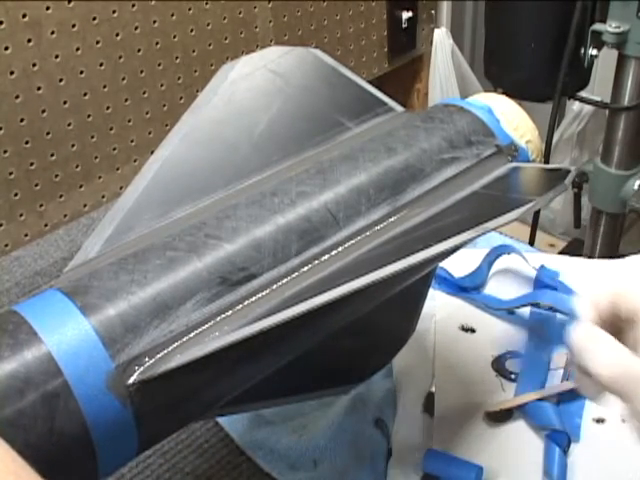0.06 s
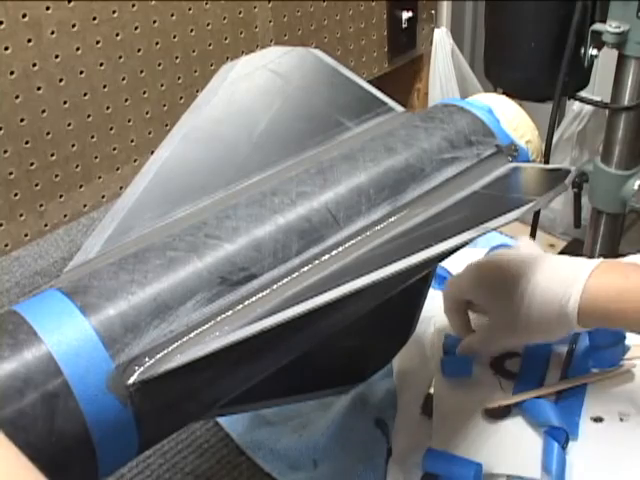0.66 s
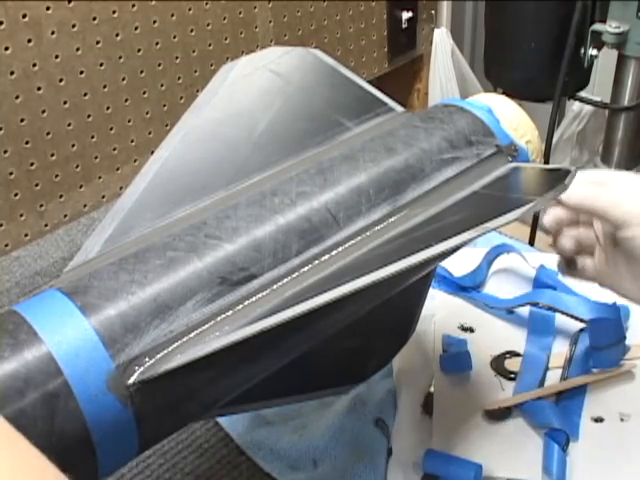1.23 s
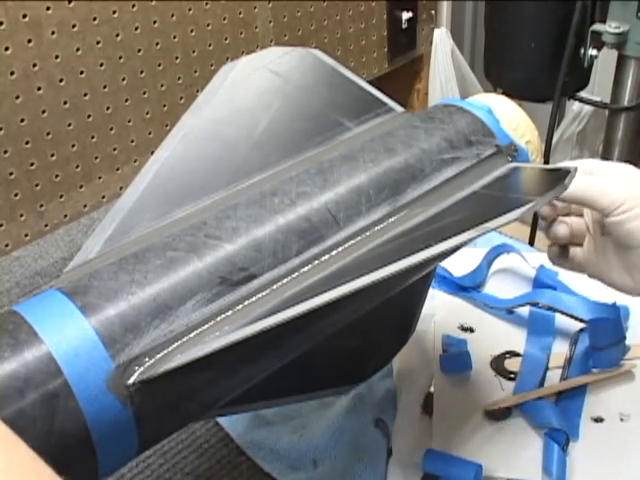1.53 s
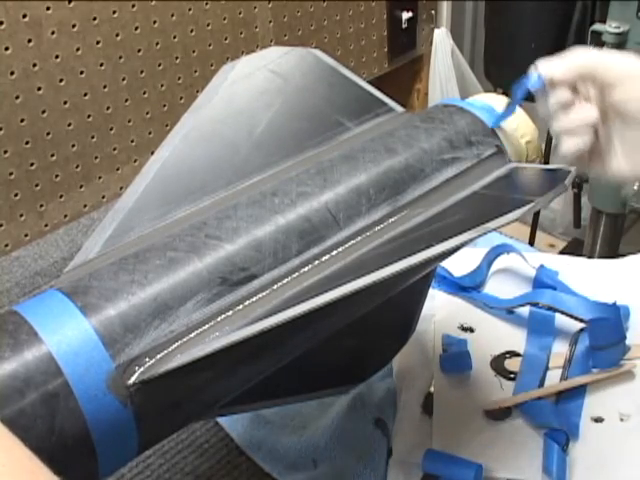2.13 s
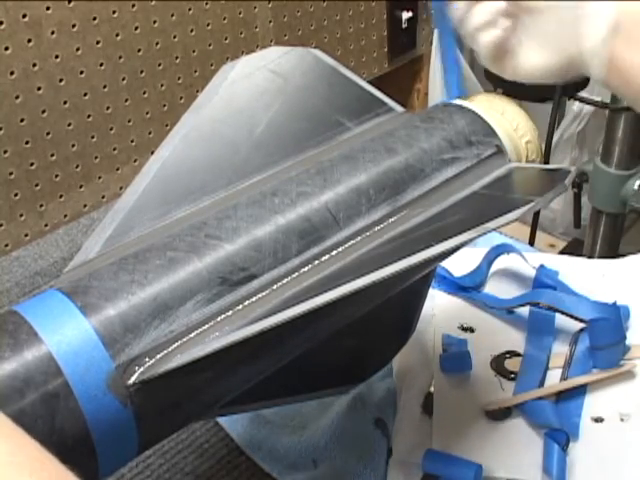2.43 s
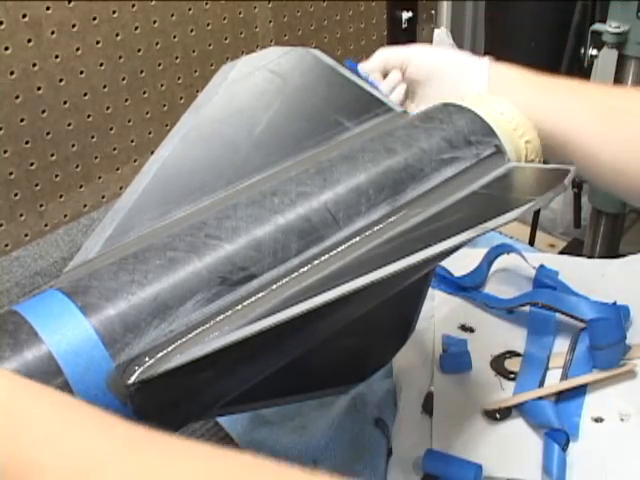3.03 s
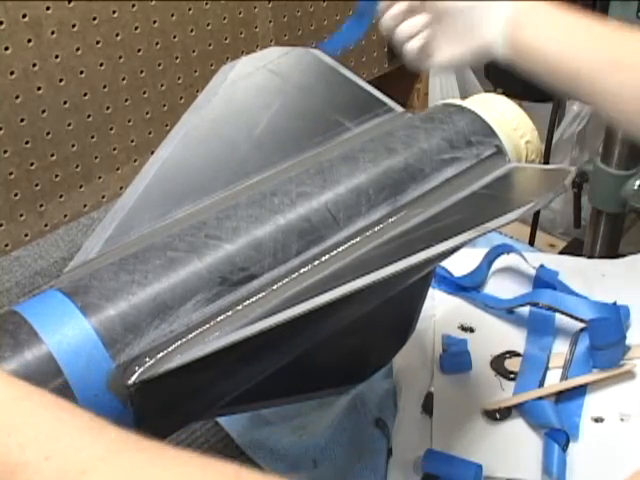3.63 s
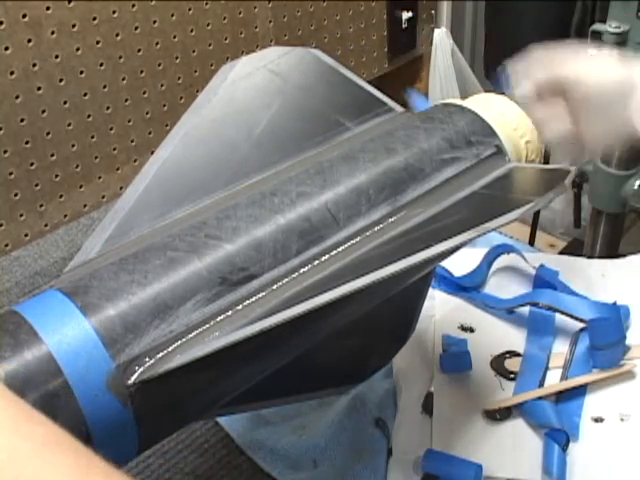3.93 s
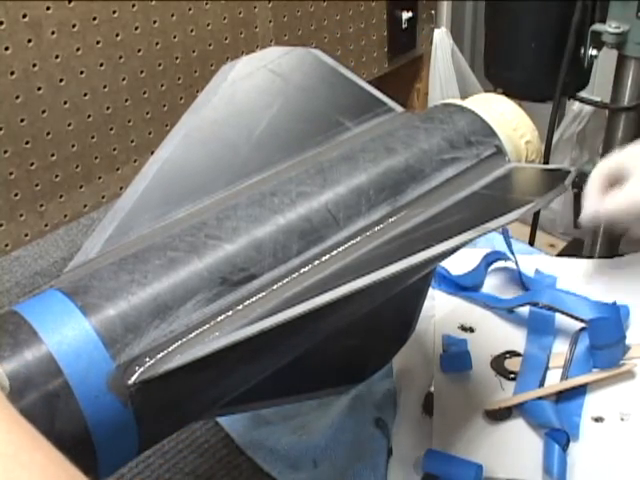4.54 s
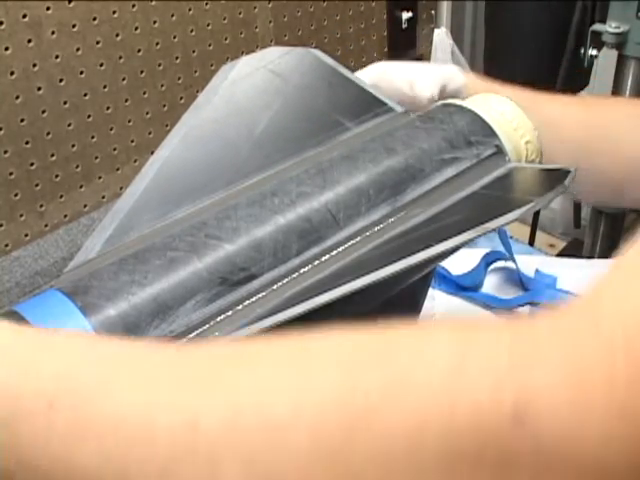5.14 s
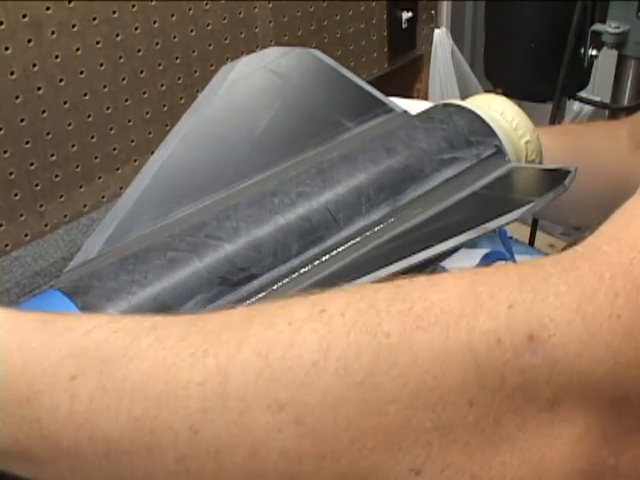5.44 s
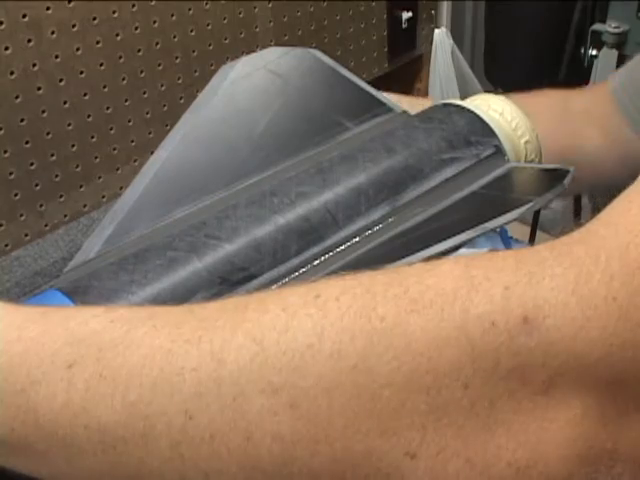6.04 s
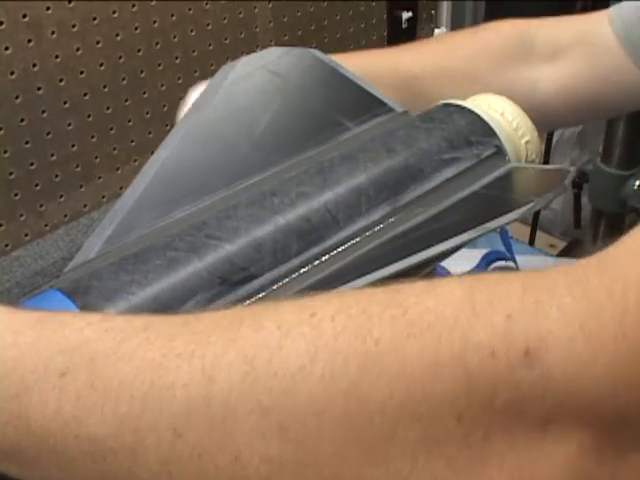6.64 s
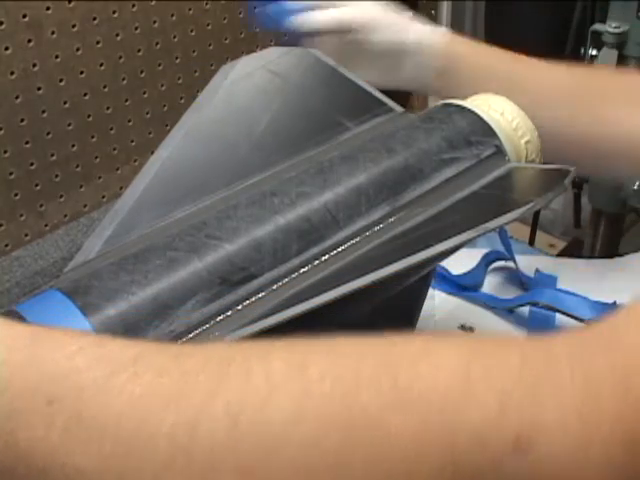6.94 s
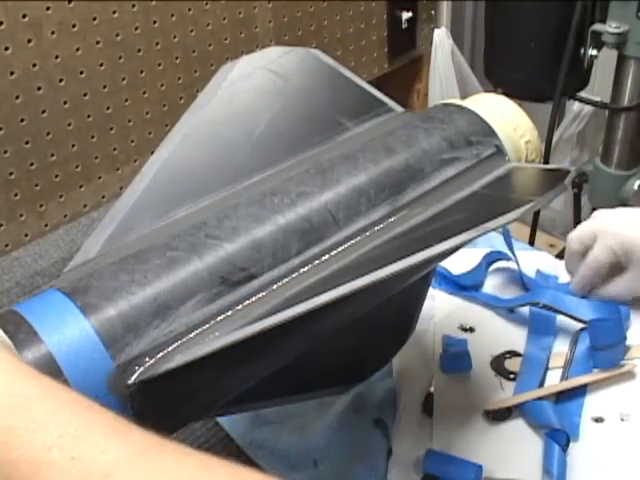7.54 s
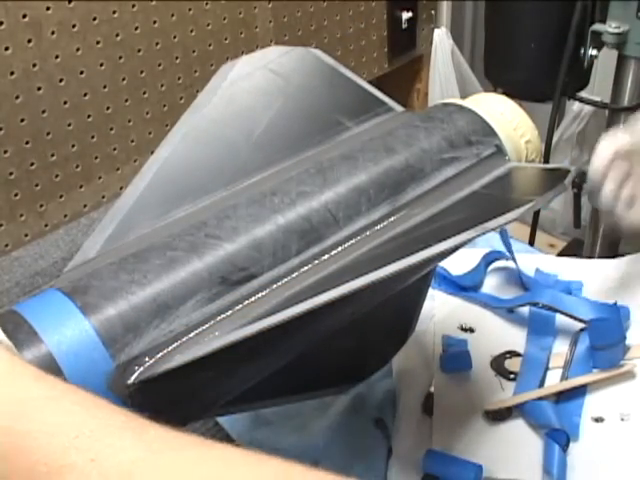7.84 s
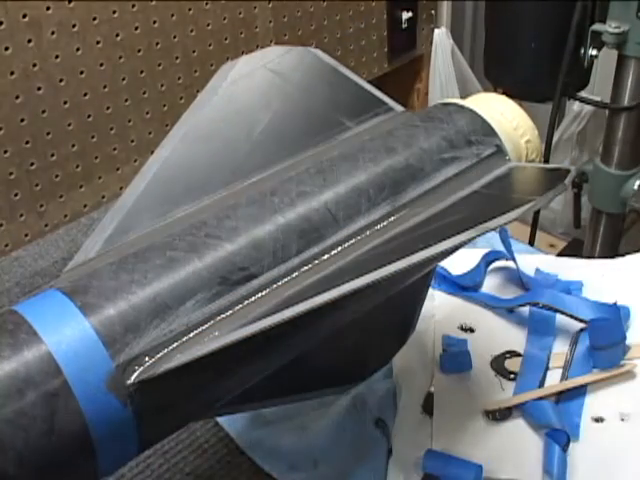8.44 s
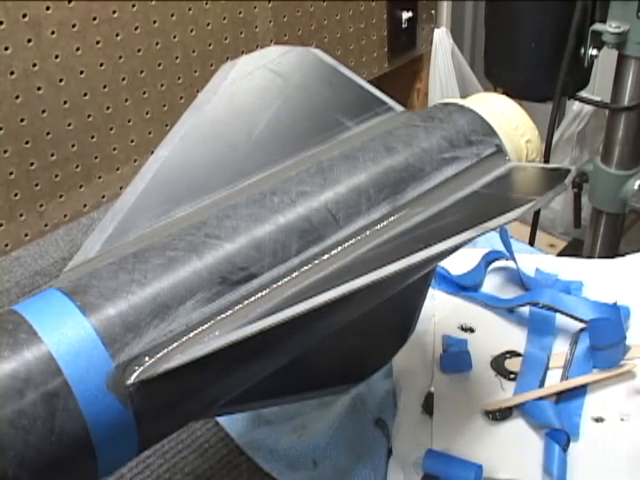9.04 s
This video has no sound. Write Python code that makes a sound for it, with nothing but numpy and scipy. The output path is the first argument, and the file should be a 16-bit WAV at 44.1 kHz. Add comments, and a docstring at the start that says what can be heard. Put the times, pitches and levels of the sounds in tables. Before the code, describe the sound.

Hollow knocks and crisp snaps punctuate soft tape peeling and one quick rip, with faint glove rustles over a low hum.

```python
"""Peeling tape from a finned tube

Masking tape is pulled off a hollow tube on a workshop bench. Glue threads snap in dense runs and ring
the tube, which rocks and knocks on its rest. A gloved hand crumples the strips and sticks them aside.
The room is small and dry, with a faint hum."""
import sys
import numpy as np
from scipy import signal
from scipy.fft import rfft, irfft
from scipy.io import wavfile

SR = 44100
rng = np.random.default_rng(int(sys.argv[2]) if len(sys.argv) > 2 else 0)


def waveform_to_disk(signal):
    """Save audio, clipped to [-1, 1], as 16-bit WAV at the path in sys.argv[1]."""
    frames = np.transpose(np.atleast_2d(signal))
    scaled = np.clip(frames, -1, 1) * 32767
    samples = np.round(scaled).astype(np.int16)
    wavfile.write(sys.argv[1], SR, samples)


N = 409248
TIME = np.arange(N) / SR

# pulling effort of four strokes, on the scale of their hiss: (time [s], level [dB])
FIRST_TUG = [(1.79, -60), (1.868, -52.5), (1.912, -51.5)]
LONG_PEEL = [(1.985, -44), (1.991, -51.5), (2.235, -53), (2.257, -48), (2.485, -52), (2.631, -47.5),
             (2.737, -54), (2.8, -73.5)]
FAST_RIP = [(3.245, -34.5), (3.285, -37.5), (3.317, -29), (3.379, -32.5), (3.385, -37.5)]
SLOW_PEEL = [(5.8, -64.5), (5.888, -64), (6.072, -55), (6.188, -58.5), (6.338, -52), (6.525, -53.5)]
# pulls: (effort curve, ring at usual effort [dB], rumble at usual effort [dB], left minus right [dB])
TAPE_PULLS = [(FIRST_TUG, -48, -49, -2), (LONG_PEEL, -52.5, -50.5, -1.5), (FAST_RIP, -62, -70, 2.3),
              (SLOW_PEEL, -50, -51.5, 3.4)]
# spectra of snapping glue and of the bench it shakes: (frequency [Hz], level [dB])
GLUE_SPECTRUM = [(1000, -10), (1700, -3), (2050, -2), (2550, -7.5), (3300, -3.5), (4100, 2), (4750, 5),
                 (5700, -0.5), (7000, -3.5), (9500, -6.5), (10700, -14), (14000, -21), (16000, -57.5)]
RUMBLE_SPECTRUM = [(25, -36), (65, 0.5), (120, -11), (178, 3), (220, -12), (268, -2), (315, -29),
                   (700, -52)]
# tube resonances driven by peeling: (frequency [Hz], bandwidth [Hz], level [dB])
WALL_RESONANCES = [(446, 27, -2.5), (539, 93, 7.5), (730, 106, 4.5), (1083, 480, 3), (1310, 36, 13.5),
                   (2440, 810, 1), (2880, 69, -8), (3800, 100, -24), (4810, 80, -19)]
# the fast rip braking: (time [s], slip rate [Hz], level [dB])
BRAKING_SLIPS = [(3.345, 2860, -32), (3.362, 1900, -40), (3.375, 1200, -33), (3.381, 615, -57),
                 (3.388, 480, -45)]
# tape snapping or creasing: (time [s], level [dB], body [dB], sizzle [dB], left minus right [dB])
SNAPS = [(0.4854, -50.5, 14, -13, -2), (.6, -42, 3, -11, -4.5), (0.6264, -45.5, -29, -19, 1),
         (0.6777, -26.5, -1, -9, -2), (.814, -51.5, 8, -31, -4), (1.924, -19, -26, -35.5, -2.5),
         (2.847, -44, -5, -17, -1), (3.1752, -37, 7, -11, 1), (3.236, -31, -7, -11, 2),
         (3.444, -39.5, 2, -12, 0), (4.0218, -41, -7, -30, -3), (4.0927, -32, -1, -22, 0),
         (4.107, -35, -11, -16, 0), (4.1654, -41.5, 0, -18, -4), (4.23, -44.5, -18, -17, -4),
         (4.3845, -54, -3, -41, 1), (5.4143, -38.5, -10, -49, 0), (6.54, -33, -5, -26, 1),
         (7.0065, -51.5, -24, -29, -1), (7.0338, -53.5, -2, -12, 3), (7.3866, -43.5, 11, -22, 4),
         (7.4018, -41, 13, -20, -7), (7.5249, -32, -4, 15, 0), (7.528, -25, -2.5, -27, -7.5),
         (8.438, -44, -12, -12, -.5), (9.097, -56, 6, -45, -9), (9.1965, -56, 3, -54, -3)]
# spectrum of a crease: (frequency [Hz], level [dB])
CREASE_SPECTRUM = [(100, -1), (400, -5.5), (1000, 3.5), (2500, -0.5), (4500, 3), (7500, 4.5), (11500, 4.5),
                   (13000, -14), (16000, -23)]
# the strip jerks taut like a drum skin: (time [s], frequency [Hz], level [dB], t60 [s])
TWANGS = [(.486, 1080, -49, 0.053), (1.9246, 474, -22, 0.018), (2.847, 1090, -41, 0.049),
          (6.542, 735, -37.5, 0.17)]
# tube striking its rest: (time [s], level [dB], contact time [ms], wall boom [dB], bench thud [dB])
KNOCKS = [(1.75, -17, 0.3, 1.5, -5), (2.969, -20, 0.23, -7.5, 0), (3.026, -32, 0.16, 3, 9.5),
          (3.157, -22, .23, -7, 1), (3.2, -28, .28, 1, 6), (3.236, -30.5, 0.33, -9, 12.5),
          (3.416, -21.5, 0.21, -20, -25), (3.426, -21.5, 0.36, 2.5, -7), (6.575, -19.5, .4, -2, -11),
          (7.708, -8, 0.09, -5, -9), (7.797, -17.5, 0.74, -4, -7)]
# first bump of each rocking: (time [s], level [dB])
ROCKINGS = [(.005, -34.5), (6.671, -34.5)]
# modes of the tube (four of the wall, then the fins) and bench: (frequency [Hz], level [dB], t60 [s])
TUBE_MODES = [(170.3, 0.5, 0.091), (192.3, 0, 0.067), (237, -7.5, 0.065), (264.3, -17.5, 0.46),
              (341.4, -7.5, 0.25), (431.3, -14.5, 0.35), (467, -12, .1), (549, -9, 0.17),
              (623, -15.5, 0.17), (753, -1, 0.1), (812, -18, 0.25), (955, -15, 0.066), (1083, -0.5, 0.16),
              (1122, 1, 0.079), (1333, 0, .12), (1538, -6, 0.077), (1738, -1.5, 0.15), (1926, -2, 0.095),
              (2100, -5, 0.083), (2320, -44, .09), (2680, -38, .08), (2900, -41, 0.052), (3200, -36, .07),
              (3250, -33, .07), (4060, -12, .08), (4220, -16, 0.077), (4930, -2, 0.08)]
BENCH_MODES = [(61.8, -15.5, 0.36), (71.8, -16.5, 0.77), (117, -14, .22)]
# the tube's many close modes, merged: (frequency [Hz], level [dB])
CLATTER_SPECTRUM = [(60, -19), (180, 2), (380, -2), (600, -10.5), (1200, -1.5), (1900, -6.5), (2700, -6),
                    (4200, -9.5), (7000, -12), (11000, -21), (16000, -47)]
# glove on tape: (time of firmest touch [s], rise [s], fall [s], level [dB], relative palm level [dB])
RUBS = [(.615, 0.054, 0.11, -58, 0), (2.945, 0.05, 0.064, -50.5, -13), (3.14, 0.082, .04, -54.5, -6),
        (4.062, 0.041, .04, -58, 7.5), (4.155, 0.079, 0.054, -50.5, 0), (4.239, 0.026, 0.077, -48, -6.5),
        (4.845, 0.062, 0.16, -56, -3), (5.09, 0.12, 0.16, -56.5, -6), (5.24, 0.13, 0.084, -52, -6),
        (5.655, 0.089, 0.078, -55, -5), (5.79, 0.05, 0.054, -57, 2), (7.345, 0.034, 0.07, -59, -26),
        (7.408, .018, 0.053, -52, 1), (7.517, 0.07, 0.09, -47, -4), (7.83, 0.051, 0.072, -49.5, -7),
        (8.441, 0.036, 0.11, -50, -11.5), (8.646, .1, 0.099, -55.5, -3.5), (9.122, 0.033, 0.069, -58, 6),
        (9.21, .018, 0.1, -66, 6)]
# spectra of the glove and the cupped palm: (frequency [Hz], level [dB])
GLOVE_SPECTRUM = [(1000, -30.5), (2050, 0.5), (3300, -2.5), (4800, -1), (6000, -2.5), (7800, -8),
                  (11000, -19), (15500, -39)]
PALM_SPECTRUM = [(200, -2), (500, -5), (1100, 4), (2000, -3), (3000, -13), (6000, -81)]
# reverberation time: (frequency [Hz], t60 [s])
ROOM_DECAY = [(60, 0.82), (200, 0.41), (800, 0.36), (4000, 0.29), (9000, 0.27), (16000, 0.16)]
# stereo width of diffuse sound and of the air: (frequency [Hz], side over mid [dB])
DIFFUSE_WIDTH = [(40, -14), (180, -15), (300, -8), (700, -3), (2000, 1), (12000, 2)]
AIR_WIDTH = [(60, 0.5), (110, 0), (200, -2), (380, -1.5), (700, -2.5), (1290, -4), (2380, 0), (4400, 0),
             (8120, 0), (15000, 0.5)]
# ambient noise: (frequency [Hz], level [dB])
AIR_SPECTRUM = [(15, -13), (25, -4), (87, -6), (123, -6), (145, -9.5), (223, -6), (326, -16.5), (363, -10),
                (439, -16), (476, -13.5), (624, -17), (2050, -22), (3340, -25), (5000, -23), (16000, -37.5)]
# faint ringing hiss: (frequency [Hz], bandwidth [Hz], level [dB])
WHISTLE_PEAKS = [(4560, 140, 3), (4930, 160, -11), (6620, 200, 3)]
# hum: (frequency [Hz], level [dB])
HUM_TONES = [(119, -66), (479.1, -71)]


def peel(hiss_db=-0.5, echo_share=0.028, first_trip_ms=0.51, trip_ms_per_s=1.0, usual_effort_db=-51):
    """Stick-slip fracture: glue threads snap; the strip radiates the hiss, the tube and bench the lows."""
    ring_growth, rumble_growth = 0.86, 0.85  # dB per dB of effort
    grip = undb(1.1 * walk(rate=50) + 1.2 * walk(rate=350))
    threads, aside = (grains(rate=11000, scatter_db=3) * grip for _ in range(2))
    strip = spread(colour(threads, GLUE_SPECTRUM), undb(2) * colour(aside, GLUE_SPECTRUM))
    strip = flex(strip, depth_db=2, rate=11)
    wall_mid, wall_side = (unit(resonate(x, WALL_RESONANCES)) for x in (threads, aside))
    wall = spread(wall_mid, undb(-37) * wall_side)
    rumble = unit(colour(threads, RUMBLE_SPECTRUM))
    out = np.zeros((2, N))
    for effort, wall_db, rumble_db, pan_db in TAPE_PULLS:
        gate, effort_db = stroke(effort)
        extra_db = effort_db - usual_effort_db
        # each snap runs up the free strip and back; the trip lengthens as tape comes off
        trip_s = (first_trip_ms + trip_ms_per_s * np.maximum(TIME - effort[0][0], 0)) / 1000
        hiss = strip + echo_share * np.array([np.interp(TIME - trip_s, TIME, ear) for ear in strip])
        lows = wall * undb(wall_db + ring_growth * extra_db)
        lows += rumble * undb(rumble_db + rumble_growth * extra_db)
        out += gate * (hiss * undb(effort_db + hiss_db) * pan(pan_db) + lows)
    return out


def flex(x, depth_db, rate):
    """Amplitude modulation: as the strip bends and twists, its bands swell and fade independently."""
    spectrum, hz = rfft(x), np.fft.rfftfreq(N, 1 / SR)
    centres = np.geomspace(1800, 11000, 12)
    bands = (irfft(spectrum * along(np.c_[centres, share], hz), N) for share in np.eye(len(centres)))
    return unit(sum(band * undb(depth_db * walk(rate)) for band in bands))


def squeak(jitter=0.073):
    """Stick-slip oscillation: as the rip brakes, its slips fall into step in a rough, falling zip."""
    gate, hz, db = stroke(BRAKING_SLIPS, edge_s=0.002)
    phase = 2 * np.pi * np.cumsum(hz * (1 + jitter * walk(rate=910))) / SR
    return gate * undb(db) * (np.sin(phase) + undb(3) * np.sin(2 * phase))


def snaps(crack_db=10, side_db=-1, burst_t60=0.014, flutter_db=-9.5, flutter_t60=0.19):
    """Sudden release of tension: a patch of tape cracks loose, then the strip flutters or twangs."""
    clean_break_db, flutter_loss = -30.5, 1.5  # loss in dB per dB above a clean break
    out, t = np.zeros((2, N)), TIME[:SR // 3]
    hz, click = np.transpose(CREASE_SPECTRUM)[0], signal.unit_impulse(len(t))
    for s, db, body_db, sizzle_db, pan_db in SNAPS:
        tilt_db = along([(900, body_db), (2200, 0), (6000, 0), (10000, sizzle_db)], hz)
        strip = colour(click, np.c_[hz, along(CREASE_SPECTRUM, hz) + tilt_db])
        # a hard snap pulls the strip clear, so it flutters less
        tail_db = flutter_db - flutter_loss * max(db - clean_break_db, 0)
        envelope = fade(t, burst_t60) + undb(tail_db) * fade(t, flutter_t60)
        mid, side = rng.standard_normal((2, len(t))) * envelope
        force = spread(mid + undb(crack_db) * click, undb(side_db) * side)
        burst = signal.fftconvolve(force, strip[None] / np.linalg.norm(strip), axes=1)
        add(out, s, burst * undb(db) * pan(pan_db))
    for s, pitch_hz, db, t60 in TWANGS:
        add(out, s, ring([(pitch_hz, db, t60)], t))
    return out


def knocks(clatter_db=-4, clatter_t60=0.063, rattle_db=-15, rattle_t60=0.31, fins_db=-13.5, pan_db=2):
    """Impact excitation: each blow rings wall, fins and bench; a longer contact removes treble."""
    out, t = np.zeros((2, N)), TIME[:SR * 3 // 4]
    wall_modes, fin_modes = TUBE_MODES[:4], TUBE_MODES[4:]
    boom, thud = ring(wall_modes, t), ring(BENCH_MODES, t)
    envelope = fade(t, clatter_t60) + undb(rattle_db) * fade(t, rattle_t60)
    for s, db, contact_ms, boom_db, thud_db in KNOCKS + rocking():
        mid, side = (unit(colour(rng.standard_normal(len(t)), CLATTER_SPECTRUM)) for _ in range(2))
        clatter = spread(mid, colour(side, DIFFUSE_WIDTH)) * envelope
        fins = np.array([ring(fin_modes, t, vary_db=-2) for _ in range(2)])
        shell = undb(fins_db) * fins + undb(clatter_db) * clatter
        force = t * fade(t, 3 * contact_ms / 1000)
        shell = signal.fftconvolve(shell, force[None] / force.sum(), axes=1)[:, :len(t)]
        add(out, s, undb(db) * (shell + undb(boom_db) * boom + undb(thud_db) * thud))
    return out * pan(pan_db)


def rocking(count=3, gap_s=0.069, shrink=0.81, loss_db=4, contact_ms=1.6, boom_db=-3, thud_db=-3):
    """Damped rocking: the tube settles in soft bumps, each sooner and weaker; rows as in KNOCKS."""
    bumps = []
    for s, db in ROCKINGS:
        for k in range(count):
            bumps.append((s, db - k * loss_db, contact_ms, boom_db, thud_db))
            s += gap_s * shrink ** k
    return bumps


def rubs():
    """Sliding friction: the glove crackles over crumpled tape, and the cupped palm adds a duller part."""
    catch = undb(1.3 * walk(rate=140))
    crackle, aside = (grains(rate=5000, scatter_db=-1.5) * catch for _ in range(2))
    glove = spread(unit(colour(crackle, GLOVE_SPECTRUM)), unit(colour(aside, GLOVE_SPECTRUM)))
    palm = spread(unit(colour(crackle, PALM_SPECTRUM)), undb(-13) * unit(colour(aside, PALM_SPECTRUM)))
    out = np.zeros((2, N))
    for s, rise_s, fall_s, db, palm_db in RUBS:
        out += undb(db) * swell(s, rise_s, fall_s) * (glove + undb(palm_db) * palm)
    return out


def room(dry, wet_db, bass_db=0, gap_s=0.0026):
    """Reverberation: diffuse echoes decay band by band, wide in the treble and narrow in the bass."""
    t = TIME[:SR * 2 // 3]
    hz = np.fft.rfftfreq(len(t), 1 / SR)
    centres = np.geomspace(60, 16000, 9)
    mid, side = rfft(rng.standard_normal((2, len(t))))
    field = spread(mid, side * undb(along(DIFFUSE_WIDTH, hz)))
    field *= undb(along([(200, bass_db), (1500, 0)], hz))
    echo = 0
    for centre, share in zip(centres, np.eye(len(centres))):
        band = irfft(field * along(np.c_[centres, share], hz), len(t))
        decay = fade(t, along(ROOM_DECAY, centre)) * (t > gap_s)
        echo += band * decay / np.linalg.norm(decay)
    return dry + undb(wet_db) * signal.fftconvolve(dry.mean(axis=0)[None], echo, axes=1)[:, :N]


def background(air_db=-60, whistle_db=-75):
    """Noise floor: broadband workshop air, a narrowband hiss and a slightly wavering hum."""
    mid, side = (colour(rng.standard_normal(N), AIR_SPECTRUM) for _ in range(2))
    air = spread(mid, colour(side, AIR_WIDTH)) / np.std(mid)
    air *= undb(air_db + 0.13 * walk(rate=5.4))
    whistle = undb(whistle_db) * unit(resonate(rng.standard_normal((2, N)), WHISTLE_PEAKS))
    hum = 0
    for hz, db in HUM_TONES:
        amplitude = np.sqrt(2) * undb(db + 0.79 * walk(rate=8.6))
        hum += amplitude * np.sin(2 * np.pi * hz * TIME + 0.5 * walk(rate=9.5))
    return air + whistle + hum


def grains(rate, scatter_db):
    """Shot noise: random clicks of uneven size, at a mean rate per second."""
    sizes = undb(scatter_db * np.minimum(rng.exponential(size=N), 4)) * rng.standard_normal(N)
    return unit(sizes * (rng.random(N) < rate / SR))


def walk(rate):
    """Random modulation of unit variance, with rate new values per second."""
    knots = rng.standard_normal(N // 20)
    return np.sqrt(3 / 2) * np.interp(TIME * rate, np.arange(len(knots)), knots)


def ring(modes, t, vary_db=0):
    """Modal superposition: damped sines of alternating sign, their shares scattered by vary_db."""
    shares = undb(vary_db * rng.standard_normal(len(modes)))
    return sum((-1) ** k * shares[k] * undb(db) * np.sin(2 * np.pi * hz * t) * fade(t, t60)
               for k, (hz, db, t60) in enumerate(modes))


def resonate(x, peaks):
    """Forced response of parallel resonators."""
    return sum(undb(db) * signal.lfilter(*signal.iirpeak(hz, hz / width, SR), x)
               for hz, width, db in peaks)


def colour(x, points, size=4096):
    """Minimum-phase filtering by a (frequency [Hz], level [dB]) curve."""
    gain = undb(along(points, np.fft.rfftfreq(size, 1 / SR)))
    cepstrum = irfft(np.log(gain))
    cepstrum[1:size // 2] *= 2
    cepstrum[size // 2 + 1:] = 0
    return signal.fftconvolve(x, irfft(np.exp(rfft(cepstrum))))[:len(x)]


def stroke(rows, edge_s=0.026):
    """Linear interpolation of one hand movement: a gate, then a curve for each column after time."""
    s, *columns = np.transpose(rows)
    gate = np.interp(TIME, [s[0] - edge_s, s[0], s[-1], s[-1] + 2 * edge_s], [0, 1, 1, 0])
    return [gate] + [np.interp(TIME, s, column) for column in columns]


def swell(s, rise_s, fall_s, drop_db=16.5, curve=1.3):
    """Amplitude envelope of a touch that firms up until time s, then lets go."""
    away = np.maximum((s - TIME) / rise_s, (TIME - s) / fall_s)
    return undb(-drop_db * np.minimum(away, 10) ** curve)


def fade(t, t60):
    """Exponential decay, 60 dB down at t60."""
    return np.exp(-np.log(1000) * t / t60)


def along(points, hz):
    """Interpolation on a logarithmic frequency axis."""
    frequency, value = np.transpose(points)
    return np.interp(np.log(hz + 1), np.log(frequency), value)


def undb(db):
    """Amplitude ratio of a level in decibels."""
    return 10 ** (np.asarray(db) / 20)


def unit(x):
    """Normalisation to rms 1."""
    return x / np.sqrt(np.mean(x ** 2) + 1e-20)


def add(out, s, x):
    """Superposition of x on out from time s."""
    i = int(s * SR)
    out[..., i:i + x.shape[-1]] += x[..., :N - i]


def pan(db):
    """Level-difference panning: two gains, left minus right in dB."""
    return undb(np.array([[0.5], [-0.5]]) * db)


def spread(mid, side):
    """Sum and difference stereo: left and right from mid and side."""
    return np.array([mid + side, mid - side])


def scene():
    """Direct plus reverberant sound in one small room; the snaps are closest and stay driest."""
    sliding = room(peel() + squeak() + rubs(), wet_db=-5.5)
    cracks = room(snaps(), wet_db=-11)
    blows = room(knocks(), wet_db=-9.5, bass_db=-0.5)
    return sliding + cracks + blows + background()


def record(dry, cutoff_hz=15850):
    """Band limiting: a steep low-pass filter removes the highest treble."""
    return signal.sosfilt(signal.ellip(10, 0.2, 70, cutoff_hz, fs=SR, output="sos"), dry)


dry = scene()
out = record(dry)
waveform_to_disk(out)
```